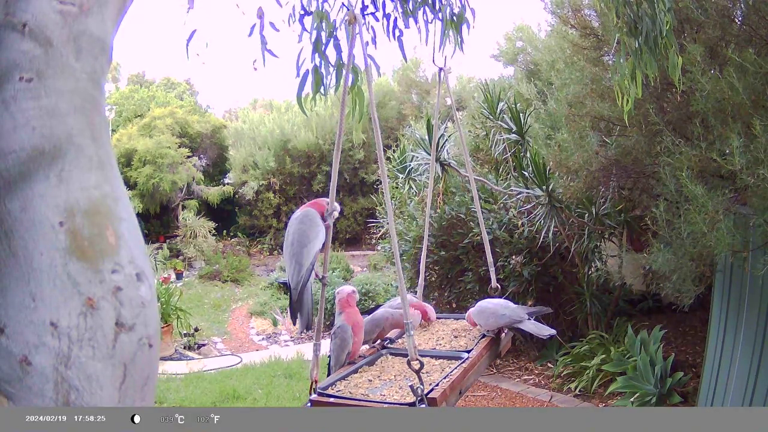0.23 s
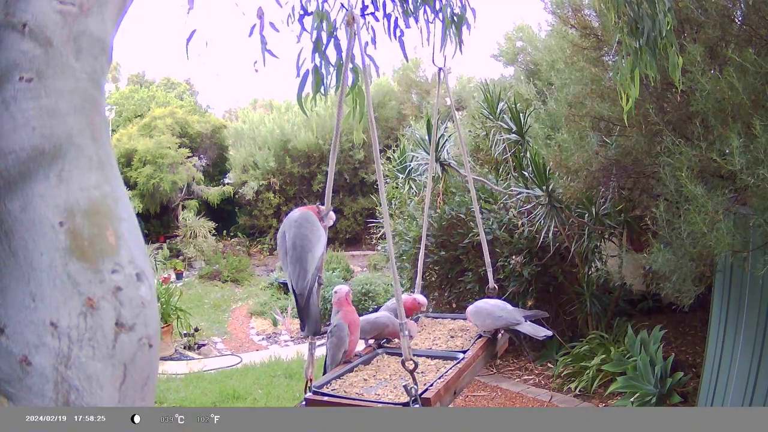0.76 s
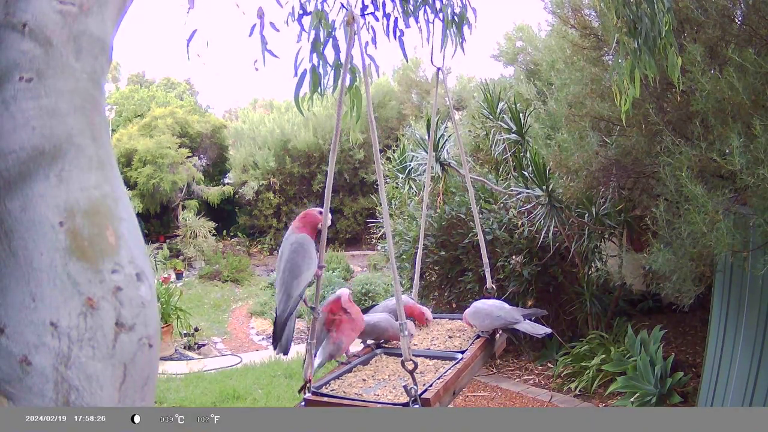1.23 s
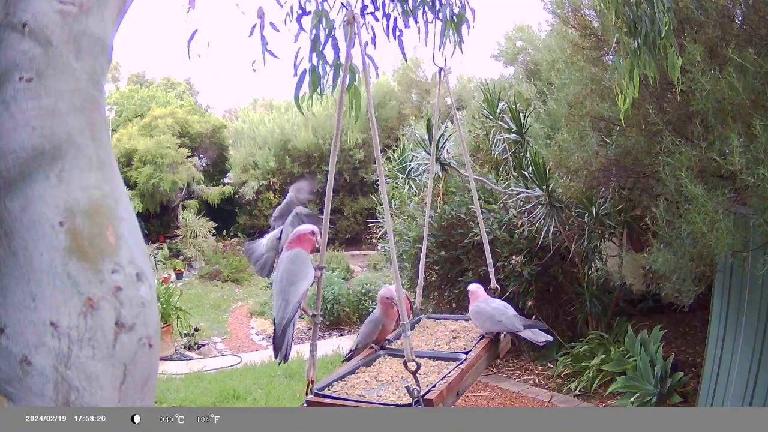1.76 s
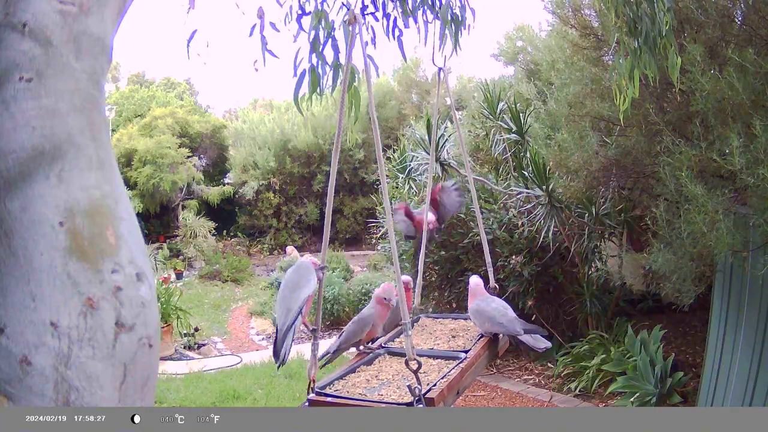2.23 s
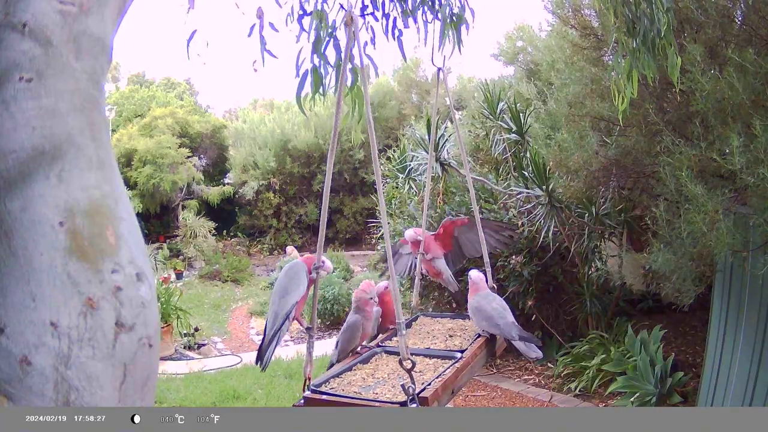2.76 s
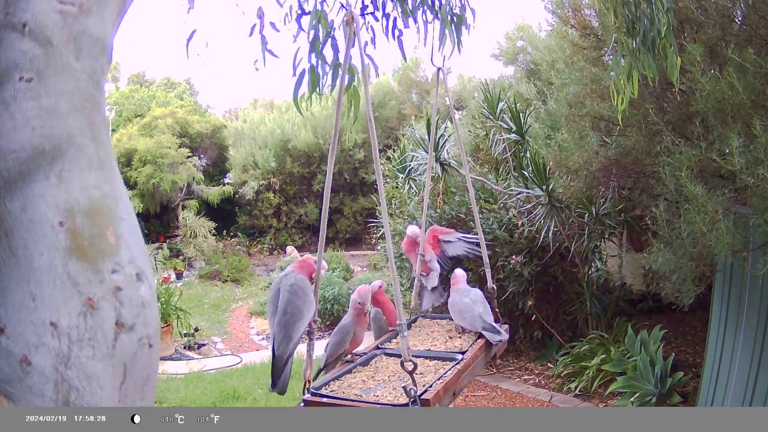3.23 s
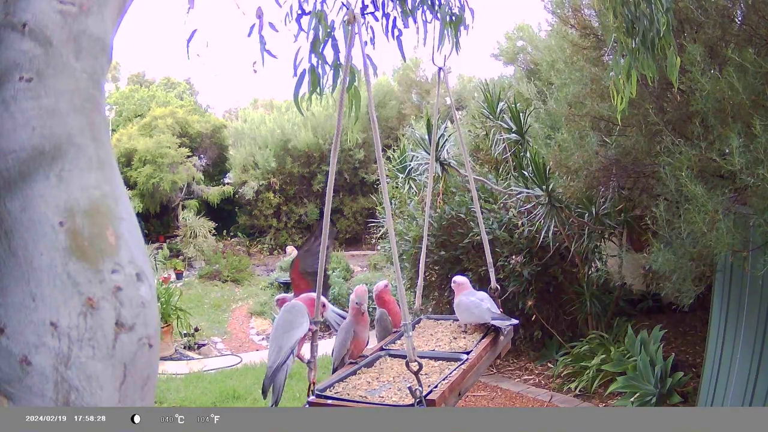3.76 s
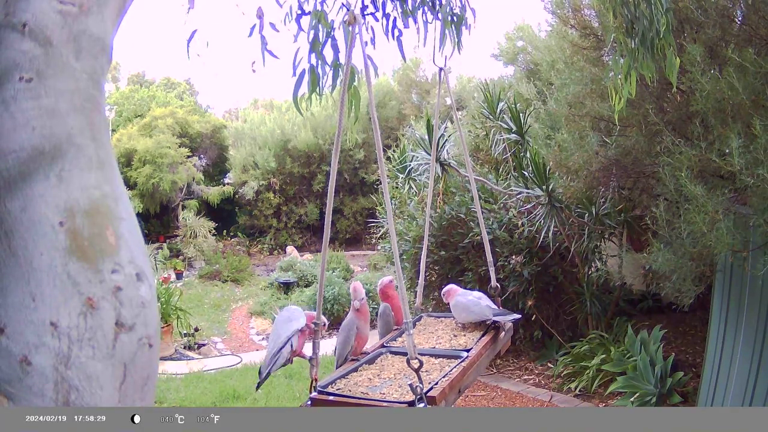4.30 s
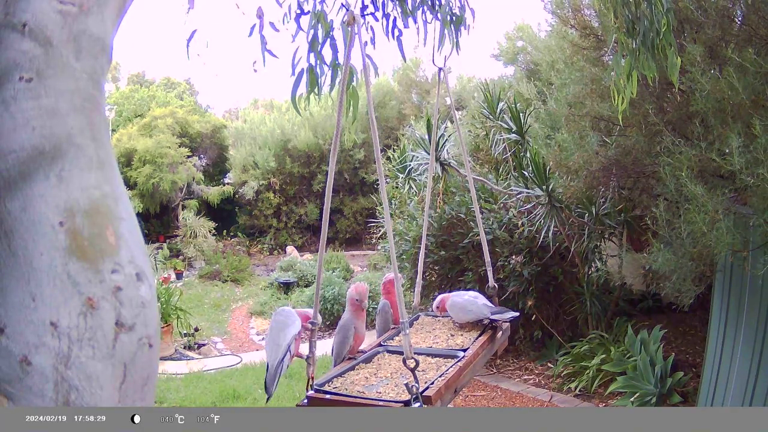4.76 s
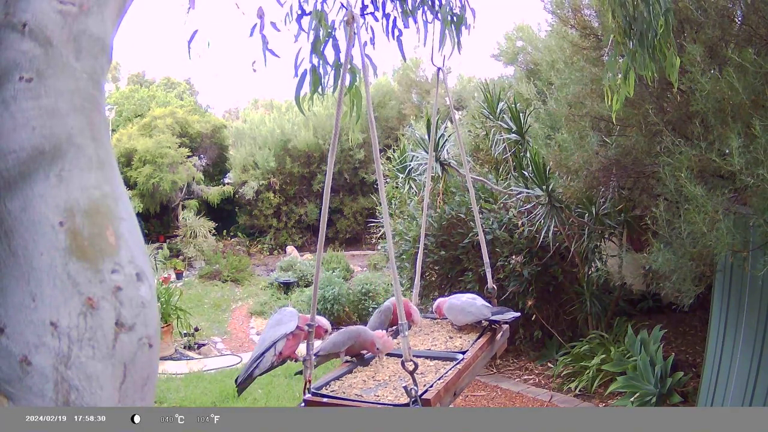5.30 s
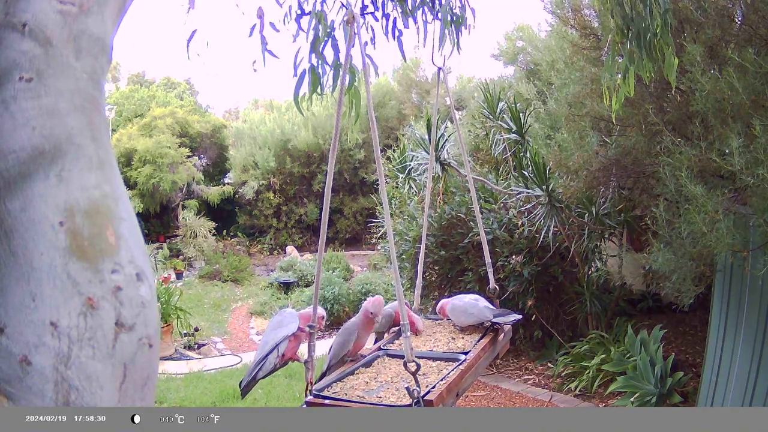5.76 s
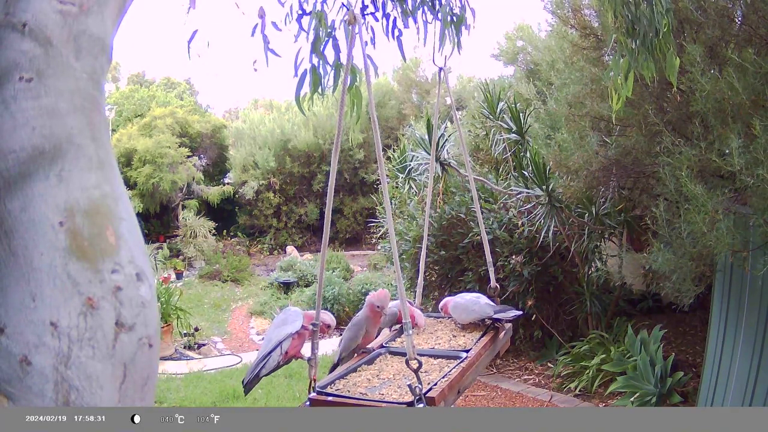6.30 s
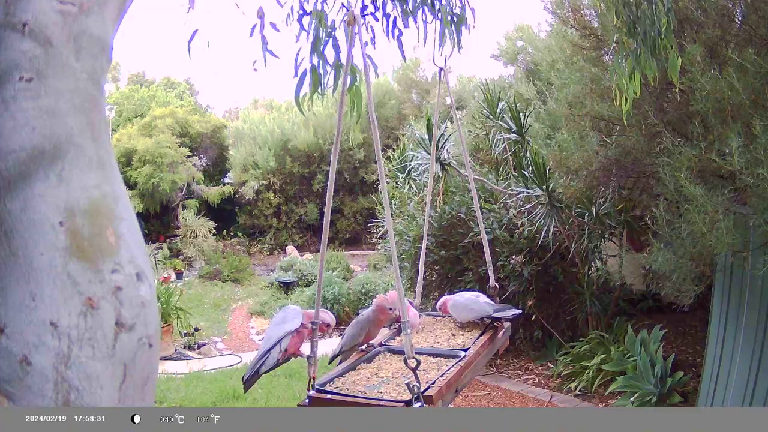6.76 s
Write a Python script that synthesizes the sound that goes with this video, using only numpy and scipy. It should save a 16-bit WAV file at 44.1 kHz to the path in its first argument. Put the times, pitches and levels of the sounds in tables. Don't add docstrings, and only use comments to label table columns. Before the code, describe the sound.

Parrots at a garden seed tray: brief raspy squawks, beak ticks and knocks, fluttering wings, a piercing shriek and quick falling whistles above faint road rumble.

```python
import sys
import numpy as np
from scipy import signal
from scipy.io import wavfile
from scipy.ndimage import uniform_filter1d

SR = 44100
rng = np.random.default_rng(int(sys.argv[2]) if len(sys.argv) > 2 else 0)


def generate_wav(sig):
    pcm = np.round(np.clip(np.atleast_2d(sig).T, -1, 1) * 32767).astype(np.int16)
    wavfile.write(sys.argv[1], SR, pcm)


def nominal_scale(level):
    x = np.asarray(level, float) / 20
    return 10 ** x


N = 310014
CONVERTER_HZ = 16000

# (frequency [Hz], level [dB per Hz])
ROAD_SPECTRUM = [(24, -31), (40, 4.5), (60, -11.5), (114, 2), (310, -13.5), (592, -13.5), (677, -22.5),
                 (865, -15.5), (1160, -28), (1320, -25.5), (7170, -47.5), (8200, -45), (10700, -90.5),
                 (18000, -120)]
# (frequency [Hz], level [dB])
DRONE = [(50, -68.5), (99.5, -52), (148, -56), (600, -62)]
# (time [s], rumble [dB])
PASSING_CAR = [(1.4, -62.5), (2, -56), (3.3, -64.5), (3.8, -52), (4.4, -49.5), (4.7, -54.5), (5, -59)]

# (time [s], feather rustle [dB])
FLOCK_STIR = [(0, -61), (1.3, -66), (1.5, -56.5), (2.7, -57.5), (2.9, -67), (3.35, -65), (3.45, -54),
              (4.2, -60), (5.1, -61), (5.4, -67), (7.03, -69)]
# (frequency [Hz], level [dB per Hz])
RUSTLE_SPECTRUM = [(150, -10.5), (400, -3.5), (900, -6.5), (1500, -11.5), (3000, -15), (5000, -19.5),
                   (7300, -14), (8500, -31)]
# (time [s], swish [dB], length [s])
WING_STROKES = [(1.72, -60.5, 0.093), (1.823, -57, 0.075), (1.928, -54.5, 0.07), (2.08, -60, 0.032),
                (2.18, -64, 0.075), (2.316, -59, 0.045), (2.446, -57.5, .036), (2.521, -52, 0.027),
                (2.635, -50.5, 0.012), (2.717, -55.5, 0.11), (2.787, -56, 0.014), (3.217, -57, 0.042),
                (3.318, -54, 0.018), (3.424, -58, 0.13), (3.589, -42.5, 0.017), (3.677, -64, 0.023),
                (3.789, -53.5, 0.046), (3.944, -60, 0.057), (4.036, -56, 0.072), (4.151, -56.5, 0.06),
                (4.32, -58.5, 0.16)]
# (take-off [s], landing [s], push [dB])
FLIGHTS = [
    (1.446, 2.747, -43),
    (3.498, 4.6, -47.5),
    (4.9, 5.6, -53.5),
]
BREEZE_DB, FLIGHT_EDGE_S = -53, .06

# (time [s], peak [dB], ring [Hz], time to fall 60 dB [s])
SEED_CRACKS = [(0.522, -50, 3900, 0.03), (0.999, -46.5, 2790, 0.025), (1.277, -45, 6350, 0.024),
               (1.421, -40, 4320, 0.053), (1.452, -29, 4400, 0.022), (1.5226, -34.5, 4140, 0.033),
               (2.372, -36, 5100, 0.022), (2.445, -42.5, 5330, 0.03), (2.5563, -39, 6000, 0.023),
               (2.7287, -39.5, 4640, 0.047), (2.7775, -41.5, 4680, 0.035), (2.9683, -42, 5530, 0.019),
               (3.0193, -35.5, 4840, 0.04), (3.1346, -39, 4700, 0.041), (3.192, -52, 3050, 0.034),
               (3.2284, -34.5, 5300, 0.034), (3.3814, -41, 5630, 0.042), (4.0385, -40, 5840, 0.039),
               (5.822, -44.5, 3750, 0.018), (5.8583, -44, 3770, 0.017), (5.885, -48, 3910, 0.013),
               (5.9235, -43.5, 4550, 0.046), (5.9915, -32, 5300, 0.019), (6.025, -51, 3620, 0.029),
               (6.095, -45, 2900, 0.022), (6.227, -46, 3430, 0.012), (6.481, -36, 5230, 0.028),
               (6.6348, -49, 3970, 0.03),
               (0.021, -50.5, 5470, .02), (.154, -42, 6800, .02), (.243, -36.5, 5500, .04),
              (.643, -51, 5740, .02), (.692, -51, 6000, .015), (.716, -53, 6500, .015),
              (.726, -55, 6000, .015), (.7892, -52, 3520, .02), (1.524, -38.5, 1710, 0.019),
              (1.636, -34, 4100, .015), (5.2899, -51, 4300, .02), (5.5837, -48.5, 3500, .02),
              (5.6331, -53, 3500, .02), (5.7353, -57, 4540, .02), (5.9015, -48, 3780, .02),
              (6.8229, -50, 4620, .02), (6.969, -54, 3500, .02)]

# (time [s], pulse rate [pulses per s], level [dB], roughness [0-1])
SQUAWKS = [
    [(.036, 590, -52, .05), (.043, 590, -28, .15), (.05, 590, -29, .5), (.059, 630, -24.5, .7),
     (.085, 610, -25.5, .85), (.106, 572, -27, .75), (.113, 530, -36, .85), (.13, 470, -50, .7)],
    [(.107, 540, -46, .7), (.114, 500, -31, .6), (.124, 460, -34, .5), (.133, 428, -30.5, .25),
     (.162, 403, -34, .22), (.197, 410, -39, .15), (.212, 460, -50, .4)],
    [(.195, 420, -54, .4), (.21, 455, -39, .6), (.235, 520, -38, .65), (.245, 545, -34, .5),
     (.257, 520, -38, .3), (.265, 500, -60, .3)],
    [(1.559, 485, -55, .2), (1.564, 500, -41, .15), (1.572, 495, -36, .3), (1.58, 460, -30, .7),
     (1.588, 455, -24, .8), (1.598, 475, -25, .45), (1.606, 488, -26, .2), (1.62, 486, -30.5, .25),
     (1.636, 490, -38, .4), (1.64, 480, -58, .33)],
]
# (chest resonance [dB], beak resonance at start [dB], at end [dB])
POSTURES = [
    (4, 3.5, -1.5),
    (-20, -2, -15),
    (1, -8, -15.5),
    (-10, -16.5, -8.5),
]
# (chest [Hz], throat at start [Hz], at end [Hz], beak at start [Hz], at end [Hz])
MOUTHS = [
    (1200, 2500, 2250, 3450, 3950),
    (1100, 2600, 2300, 3950, 3600),
    (1050, 1750, 2100, 3700, 3500),
    (1300, 2750, 2620, 4400, 4050),
]
THROAT_WIDTHS = [1150, 1250, 800, 850]
CHEST_WIDTH_HZ, BEAK_WIDTH_HZ = 380, 1300
# (frequency [Hz], level [dB])
VALLEYS = [(500, -11.5), (620, -23.5), (800, -19.5), (1700, -16.5), (3300, -19.5), (5000, -30), (8000, -28)]
ODD_FULL_AT_S, ODD_RISE_DB_PER_S = 0.033, 999
JOLT_DB, JOLT_HZ = 2, 400

# (time [s], length [s], peak [dB], first pitch [Hz], last pitch [Hz])
SWELLS = [
    (5.048, .022, -32, 2000, 2400),
    (4.665, 0.053, -43, 2150, 1900),
    (4.735, .027, -47.5, 1400, 1200),
]
SLIDES = [
    (0.452, 0.021, -53, 1850, 1550),
    (4.712, 0.028, -44, 3500, 2700),
    (5.134, .013, -38.5, 1950, 2970),
          (4.638, .042, -52, 6450, 6750),
    (.256, .024, -51, 1800, 1680),
    (5.072, .012, -54, 1900, 2500),
]
HOLDS = [
    (4.257, 0.059, -39, 3710, 3700),
    (4.306, 0.037, -48.5, 3730, 3690),
]
STEADIES = [
    (4.616, .068, -43, 2580, 2677),
    (4.655, 0.101, -45, 2726, 2820),
]
TAILS = [
    (4.755, .1, -52, 2780, 2760),
    (4.75, .11, -51, 3620, 3700),
    (4.8, .06, -54, 1950, 1900),
    (4.715, .06, -54, 5000, 4300),
    (4.676, .04, -51, 4900, 4900),
    (4.34, .08, -57, 3700, 3700),
]
THIN_NOTES = [
    (.402, 0.045, -47, 1940, 2230),
    (5.03, 0.038, -48, 2140, 2800),
]
FALLS = [
    (4.698, .063, -39, 2826, 1860),
]
LATE_FALLS = [
    (4.759, .045, -45, 2247, 1780),
]
DULL_HOLDS = [
    (4.607, 0.016, -47, 3950, 3400),
    (4.635, .035, -49.5, 3880, 4050),
    (4.681, 0.059, -41, 3700, 3740),
    (4.72, 0.05, -52, 7900, 7830),
    (4.63, .072, -60, 7680, 7750),
    (4.775, 0.02, -55, 3760, 3700),
]
GRUNTS = [
    (.554, 0.022, -49.5, 613, 620),
    (4.254, 0.031, -40, 662, 641),
]
RASPS = [
    (1.58, .018, -30, 1345, 1235),
    (1.573, .014, -34, 2250, 2150),
    (.206, .03, -43, 1780, 1700),
    (.122, .012, -42, 1100, 1000),
]
# (time [s], pitch [Hz], level [dB], beak opening on the overtones [dB])
LOUD_WHISTLES = [
    [(5.069, 3450, -60, -4), (5.073, 3600, -56, 14), (5.08, 3940, -45, 10), (5.084, 3780, -55, 16),
     (5.088, 2950, -55, 23), (5.092, 2500, -58, 16)],
    [(5.084, 3540, -67, -11), (5.089, 2655, -38, -12), (5.094, 2250, -26, -9), (5.11, 2060, -33, -1),
     (5.12, 1895, -28, -2.5), (5.1285, 1820, -36.5, -3), (5.133, 1770, -32, -1), (5.139, 1725, -42.5, 1),
     (5.16, 1670, -50, 1)],
    [(5.148, 2765, -56, -4), (5.156, 2470, -30, -0.5), (5.17, 2550, -39, 2), (5.182, 2356, -34.5, -0.5),
     (5.19, 1973, -39, 5), (5.196, 2094, -38, 3), (5.21, 1650, -42.5, 1), (5.224, 1370, -57, -5)],
]
# (time [s], pitch [Hz], level [dB], beak opening on the overtones [dB])
SHRIEK = [(4.215, 4160, -69.5, -20), (4.234, 4300, -58, -21), (4.241, 3940, -41.5, -18),
          (4.246, 3740, -32.5, -6), (4.251, 3640, -29, -4.5), (4.255, 3690, -32, 3.5),
          (4.257, 3640, -50, 6)]

# (share of length before the peak [0-1], rise [dB], sag after it [dB], lateness of the bend [power])
SWELL_SHAPE = (0.89, 18, 3, 2.3)
SLIDE_SHAPE = (0.42, 12, 8.6, 1.4)
HOLD_SHAPE = (.1, 10, 14.5, 1.1)
GRUNT_SHAPE = (0.041, 11, 2, 1.16)
STEADY_SHAPE = (.04, 14, 2.7, 0.9)
FALL_SHAPE = (.4, 9, 9, 2.1)
LATE_FALL_SHAPE = (0.59, 8.1, 1.5, .9)
RELEASE_SHARE, RELEASE_DB = 0.11, 12

# (frequency [Hz], level against the fundamental [dB])
CLEAR_BEAK = [(3300, -14.5), (4000, -7), (4500, -21.5), (4800, -16), (5300, -28), (6000, -34),
              (7400, -19.5), (9000, -42)]
HOARSE_BEAK = [(5200, -4), (5600, 0.5), (7400, -6.5), (8000, -11.5), (11000, -40)]
SHUT_BEAK = [(1250, -6), (1950, -14), (2600, -12.5)]
RASP_BEAK = [(2600, 3), (4000, -17), (5300, -18)]
FALL_BEAK = [(3800, -15), (5500, -6), (6500, -27)]
DULL_BEAK = [(7300, -14), (11000, -43)]
THIN_BEAK = [(4000, -29), (8000, -41)]
TAIL_BEAK = [(5600, -8), (7300, -21)]
CLEAR_ROUGH, SLIDE_ROUGH, HOLD_ROUGH, GRUNT_ROUGH = .03, .2, .5, .1
RASP_ROUGH, TAIL_ROUGH, STEADY_ROUGH = .5, .9, 0.28

# (time [s], peak [dB], low knock [dB], time to fall 60 dB [s])
SNAPS = [(0.349, -47, -15, 0.022), (0.7473, -43.5, -14, 0.03), (0.912, -40.5, -20, 0.012),
         (1.403, -40.5, -2, 0.074), (3.094, -35, -8.5, 0.029), (3.2838, -39.5, -15, 0.017),
         (3.6662, -42, 3, 0.015), (4.2554, -30, -8, 0.02), (5.3755, -43.5, -1.5, 0.037),
         (6.0806, -41, -9, 0.012), (6.243, -28, -1.5, 0.0059), (6.3772, -45, -13, 0.02),
         (6.623, -46, 0, 0.015), (6.78, -40, -25, 0.01)]
# (time [s], peak [dB], lowest [Hz], highest [Hz], time to fall 60 dB [s])
KNOCKS = [(0.5546, -46, 2300, 4200, 0.018), (0.5602, -37.5, 4500, 8160, .03),
          (.6205, -41.5, 650, 1390, 0.028), (0.833, -26.5, 800, 5500, 0.014), (0.853, -38, 4000, 8300, .03),
          (1.0425, -35.5, 700, 1660, 0.032), (1.044, -47, 3000, 6500, 0.033),
          (1.7627, -32.5, 1500, 5470, .01), (1.9019, -28.5, 3000, 8300, .01),
          (2.081, -39.5, 700, 4200, 0.076), (2.1718, -39, 1500, 6500, 0.016),
          (2.6946, -30.5, 1000, 7800, 0.074), (2.8223, -39, 700, 1600, 0.038),
          (3.0037, -32, 1500, 6000, 0.021), (3.0945, -36.5, 4000, 7600, 0.034),
          (3.4825, -25, 500, 3230, 0.026), (3.4822, -44, 4500, 7900, 0.055), (3.5848, -43, 2000, 7500, .06),
          (4.471, -29, 1000, 3300, 0.057), (4.4703, -26.5, 5500, 8600, 0.037),
          (5.089, -42, 1200, 8000, .02), (6.059, -42, 5000, 8300, .02), (5.8226, -46, 5000, 8300, .015),
          (5.858, -40.5, 5500, 8400, .02), (6.034, -49, 6500, 8400, .012),
          (5.9924, -38.5, 1500, 4000, 0.019), (6.025, -43, 1500, 7000, .03),
          (6.2421, -32, 1500, 3830, .008), (4.298, -38, 2000, 7500, .02), (3.032, -47, 2400, 3100, .02),
          (4.617, -44, 2000, 8000, .02)]
SHARPNESS_S = .25
# (time [s], peak [dB], ring [Hz])
FLICKS = [(1.8389, -45, 2920), (1.8708, -54, 2620), (2.0444, -46, 2570), (2.1198, -47, 3150),
          (2.1906, -47, 2860), (2.232, -50, 2720), (2.2704, -47, 3110), (2.3034, -48, 2920),
          (2.4225, -43, 2760), (2.5254, -48, 2680), (2.5822, -47, 3800), (2.7548, -48, 4000),
          (2.7914, -42, 2800), (3.4444, -40, 3770), (3.6114, -40, 4680), (3.671, -39, 3050),
          (3.7992, -42, 3300), (3.8194, -42, 3620), (3.901, -46, 2940), (4.0187, -38.5, 2610),
          (4.1369, -49, 3040), (4.1524, -43, 3010), (4.1778, -46, 3350)]
FLICK_T60_S, FLICK_DB = .045, -3
# (time [s], peak [dB], time to fall 60 dB [s])
CLAPS = [(2.023, -46, .03), (2.3957, -44, .03), (2.508, -40, 0.044), (2.4217, -44, .05), (2.5519, -41, .05),
         (2.6251, -41.5, 0.046), (2.6551, -40, 0.047), (3.3066, -56, .04), (3.3395, -51, .03),
         (3.4286, -41, 0.048), (3.5853, -40, 0.037), (3.6633, -42.5, 0.038), (3.7591, -53, .03),
         (3.7813, -41, 0.036), (4.0015, -42.5, .03), (4.1187, -48, .03)]

GARDEN_T60_S, GARDEN_DB = .48, -22


def rms_one(x):
    return x / np.sqrt(np.mean(np.abs(x) ** 2) + 1e-20)


def at_hz(points, hz):
    points = np.array(points)
    return np.interp(np.log(hz), np.log(points[:, 0]), points[:, 1])


def in_time(rows):
    s, *columns = np.transpose(rows)
    start = round(s[0] * SR)
    t = np.arange(start, round(s[-1] * SR)) / SR
    return start, [np.interp(t, s, c) for c in columns]


def drift(hz, size):
    r = np.exp(-2 * np.pi * hz / SR)
    run_in = 500 if hz > 50 else 20000
    white = rng.standard_normal(size + run_in)
    return rms_one(signal.lfilter([1], [1, -2 * r, r * r], white)[run_in:])


def band(x, low_hz, high_hz):
    return signal.sosfilt(signal.butter(2, [low_hz, high_hz], "band", fs=SR, output="sos"), x)


def banded_noise(spectrum, patchy_db, together_db, together_hz):
    edges, out = 36 * 2 ** (np.arange(25) / 3), 0
    white = rng.standard_normal((2, N))
    together = drift(together_hz, size=N)
    for k, (low, high) in enumerate(zip(edges, edges[1:])):
        level_db = at_hz(spectrum, np.sqrt(low * high))
        flicker = np.repeat(drift(400, size=N // 32 + 1), 32)[:N]
        gain = nominal_scale(level_db + patchy_db * flicker + together_db * together)
        out = out + gain * band(white[k % 2], low, high)
    return rms_one(out)


def road():
    return nominal_scale(-45) * banded_noise(ROAD_SPECTRUM, patchy_db=.8, together_db=.25, together_hz=3)


def motor_drone():
    t, out = np.arange(N) / SR, 0
    for hz, db in DRONE:
        level = nominal_scale(db + 0.98 * drift(4.2, size=N))
        out = out + level * np.sin(2 * np.pi * hz * t + 0.79 * drift(4.8, size=N))
    return out


def passing_car():
    rumble_db = np.interp(np.arange(N) / SR, *np.transpose(PASSING_CAR))
    return nominal_scale(rumble_db) * rms_one(band(rng.standard_normal(N), 217, 342))


def feather_rustle():
    t = np.arange(N) / SR
    swell = nominal_scale(np.interp(t, *np.transpose(FLOCK_STIR)))
    for at, swish_db, length in WING_STROKES:
        swell = swell + nominal_scale(swish_db) * np.exp(-8 * ((t - at) / length) ** 2 / 2)
    grain = nominal_scale(2.8 * np.repeat(drift(9000, size=N // 32 + 1), 32)[:N])
    return swell * grain * banded_noise(RUSTLE_SPECTRUM, patchy_db=2.0, together_db=.8, together_hz=40)


def pushed_air():
    t = np.arange(N) / SR
    air = nominal_scale(BREEZE_DB)
    for up, down, db in FLIGHTS:
        aloft = (np.tanh((t - up) / FLIGHT_EDGE_S) - np.tanh((t - down) / FLIGHT_EDGE_S)) / 2
        air = air + nominal_scale(db) * aloft
    return air * rms_one(band(rng.standard_normal(N), 14, 42))


def burst(low_hz, high_hz, t60, click):
    t = np.arange(3000) / SR
    grit = rng.standard_normal(len(t)) * nominal_scale(-60 * t / np.clip(t60, .003, .07))
    grit[0] = click
    x = band(grit, low_hz, high_hz)
    return x / np.abs(x).max()


def add_at(out, s, sound):
    out[round(s * SR):][:len(sound)] += sound


def seed_husks():
    out = np.zeros(N + SR)
    for s, peak_db, hz, t60 in SEED_CRACKS:
        ring = burst(.87 * hz, min(1.15 * hz, 9000), t60, click=1)
        hit = ring + nominal_scale(-8) * burst(2500, 7900, .6 * t60, click=3)
        add_at(out, s, nominal_scale(peak_db - 3.5) * hit)
    return out[:N]


def partial(phase, rough, smear_hz):
    size, rough = len(phase), np.clip(rough, 0, 1)
    noise = drift(smear_hz, size=6500)[:size] * np.cos(phase) + drift(smear_hz, size=6500)[:size] * np.sin(phase)
    steady = np.sin(phase + rng.uniform(0, 0.43))
    return np.sqrt(2 - 2 * rough) * steady + np.sqrt(rough) * noise


def hump(hz, centre_hz, width_hz):
    return 1 / (1 + (2 * (hz - centre_hz) / width_hz) ** 2) ** 1.6


def squawks():
    out = np.zeros(N + SR)
    for rows, posture, mouth, throat_width_hz in zip(SQUAWKS, POSTURES, MOUTHS, THROAT_WIDTHS):
        start, (hz, level_db, rough) = in_time(rows)
        size = len(hz)
        chest_db, open_db, close_db = posture
        chest_hz, throat_from, throat_to, beak_from, beak_to = mouth
        beak_db = np.linspace(open_db, close_db, size)
        throat_hz = np.linspace(throat_from, throat_to, size)
        beak_hz = np.linspace(beak_from, beak_to, size)
        t = (start + np.arange(size)) / SR
        odd_db = np.minimum(ODD_RISE_DB_PER_S * (t - ODD_FULL_AT_S), 0)
        waver = 1 + .012 * rough * drift(90, size=16000)[:size]
        jolt = nominal_scale(JOLT_DB * rough * np.tanh(drift(JOLT_HZ, size=size)))
        jolt = jolt / np.sqrt(uniform_filter1d(jolt ** 2, size=600))
        phase, voice = np.cumsum(2 * np.pi * hz * waver / SR), 0
        for k in range(1, 21):
            f = k * hz
            chest = nominal_scale(chest_db) * hump(f, chest_hz, CHEST_WIDTH_HZ)
            throat = hump(f, throat_hz, throat_width_hz)
            beak = nominal_scale(beak_db) * (hump(f, beak_hz, BEAK_WIDTH_HZ) + nominal_scale(-18) * hump(f, 6950, 4400))
            gain = chest + throat + beak + nominal_scale(at_hz(VALLEYS, f))
            gain = gain * nominal_scale(odd_db * (k % 2)) * (f < CONVERTER_HZ / 2)
            hoarse = .85 * rough * np.clip(f / 2400, 0, 1.1) ** 2 + .4 * (f > 4600)
            ringing = -np.pi * np.tanh((f - throat_hz) / 900)
            voice = voice + gain * np.where(f > 1600, jolt, 1) * partial(k * phase + ringing, hoarse, 290)
        loudness = np.sqrt(uniform_filter1d(voice ** 2, size=260) + 1e-12)
        out[start:start + size] += nominal_scale(level_db) * voice / loudness
    return out[:N]


def note(s, length, peak_db, first_hz, last_hz, shape):
    share, rise_db, sag_db, bend = shape
    u = np.linspace(0, 1, num=25)
    knees = [0, min(share, .95 - RELEASE_SHARE), 1 - RELEASE_SHARE, 1]
    level_db = peak_db - np.interp(u, knees, [rise_db, 0, sag_db, sag_db + RELEASE_DB])
    return np.transpose([s + u * length, first_hz + (last_hz - first_hz) * u ** bend, level_db])


def whistle_list():
    kinds = [
        (SWELLS, SWELL_SHAPE, CLEAR_BEAK, CLEAR_ROUGH),
        (SLIDES, SLIDE_SHAPE, CLEAR_BEAK, SLIDE_ROUGH),
        (HOLDS, HOLD_SHAPE, HOARSE_BEAK, HOLD_ROUGH),
        (STEADIES, STEADY_SHAPE, HOARSE_BEAK, STEADY_ROUGH),
        (TAILS, HOLD_SHAPE, TAIL_BEAK, TAIL_ROUGH),
        (THIN_NOTES, SWELL_SHAPE, THIN_BEAK, CLEAR_ROUGH),
        (FALLS, FALL_SHAPE, FALL_BEAK, SLIDE_ROUGH),
        (LATE_FALLS, LATE_FALL_SHAPE, FALL_BEAK, SLIDE_ROUGH),
        (DULL_HOLDS, HOLD_SHAPE, DULL_BEAK, HOLD_ROUGH),
        (GRUNTS, GRUNT_SHAPE, SHUT_BEAK, GRUNT_ROUGH),
        (RASPS, GRUNT_SHAPE, RASP_BEAK, RASP_ROUGH),
    ]
    notes = [(note(*row, shape), beak, rough) for table, shape, beak, rough in kinds for row in table]
    loud = [(rows, CLEAR_BEAK, CLEAR_ROUGH) for rows in LOUD_WHISTLES]
    return notes + loud + [(SHRIEK, HOARSE_BEAK, CLEAR_ROUGH)]


def whistles():
    out = np.zeros(N + SR)
    for rows, beak, rough in whistle_list():
        start, (hz, level_db, *opening_db) = in_time(rows)
        for k in (1, 2, 3, 4):
            overtone_db = (at_hz(beak, k * hz) + sum(opening_db)) * (k > 1)
            past_hz = np.maximum(k * hz - CONVERTER_HZ / 2, 0)
            phase = np.cumsum(2 * np.pi * (k * hz - 2 * past_hz) / SR)
            hoarse = np.clip(rough + .06 * (k - 1), 0, 1)
            breath = nominal_scale(-4) * np.sqrt(rough) * partial(phase, 1, 600)
            tone = partial(phase, hoarse, 52) + breath
            out[start:start + len(hz)] += nominal_scale(level_db + overtone_db - 0.0046 * past_hz) * tone
    return out[:N]


def snaps():
    out = np.zeros(N + SR)
    for s, peak_db, knock_db, t60 in SNAPS:
        hit = burst(1700, 7900, t60, click=16) + nominal_scale(knock_db) * burst(700, 1900, 1.3 * t60, click=14)
        add_at(out, s, nominal_scale(peak_db + 4.5) * hit)
    return out[:N]


def knocks():
    out = np.zeros(N + SR)
    for s, peak_db, low_hz, high_hz, t60 in KNOCKS:
        add_at(out, s, nominal_scale(peak_db) * burst(low_hz, high_hz, t60, click=SHARPNESS_S / t60))
    return out[:N]


def feather_flicks():
    out = np.zeros(N + SR)
    for s, peak_db, hz in FLICKS:
        hit = burst(.6 * hz, min(1.5 * hz, 8000), FLICK_T60_S, click=1)
        add_at(out, s, nominal_scale(peak_db + FLICK_DB) * hit)
    return out[:N]


def wing_claps():
    out = np.zeros(N + SR)
    for s, peak_db, t60 in CLAPS:
        hit = burst(400, 2600, t60, click=4) + nominal_scale(-11) * burst(2600, 7500, t60, click=2)
        add_at(out, s, nominal_scale(peak_db) * hit)
    return out[:N]


def garden(x):
    t = np.arange(SR // 2) / SR
    scattered = rng.standard_normal(len(t)) * (rng.random(len(t)) < .02)
    echoes = band(scattered * nominal_scale(-60 * t / GARDEN_T60_S) * (t > .008), 920, 9800)
    return nominal_scale(GARDEN_DB) * signal.fftconvolve(x, echoes / np.sqrt(np.sum(echoes ** 2)))[:N]


def scene():
    background = road() + motor_drone() + passing_car() + feather_rustle() + pushed_air()
    near = squawks()
    birds = seed_husks() + whistles() + snaps() + knocks() + feather_flicks() + wing_claps()
    echoes = garden(birds + nominal_scale(-6) * near)
    return (near + birds + echoes + background)[None]


def top_cut(x):
    return signal.sosfilt(signal.butter(12, 8970, fs=SR, output="sos"), x)


def record(dry):
    kept = signal.sosfiltfilt(signal.cheby1(10, .1, CONVERTER_HZ / 2, fs=SR, output="sos"), dry)
    top = signal.sosfilt(signal.butter(6, 6500, "high", fs=SR, output="sos"), kept)
    mirror = top * 2 * np.cos(2 * np.pi * CONVERTER_HZ * np.arange(N) / SR)
    mixed = signal.sosfilt(signal.butter(4, 7600, fs=SR, output="sos"), kept + nominal_scale(15) * mirror)
    cut = signal.sosfilt(signal.cheby2(12, 70, 9150, fs=SR, output="sos"), mixed)
    offset = .0049
    return top_cut(cut + offset)


dry = scene()
out = record(dry)
generate_wav(out)
```